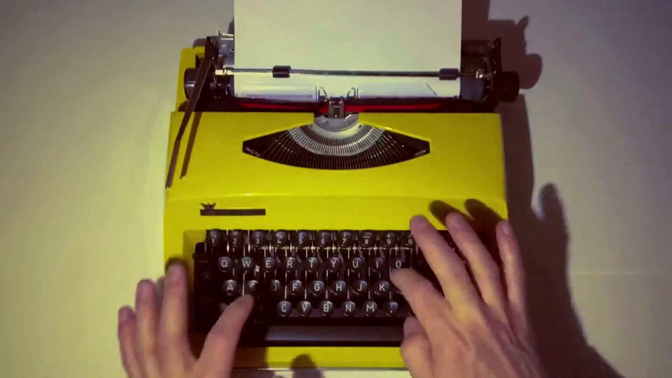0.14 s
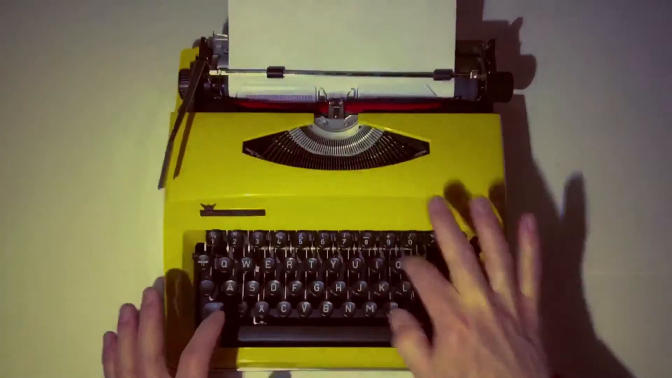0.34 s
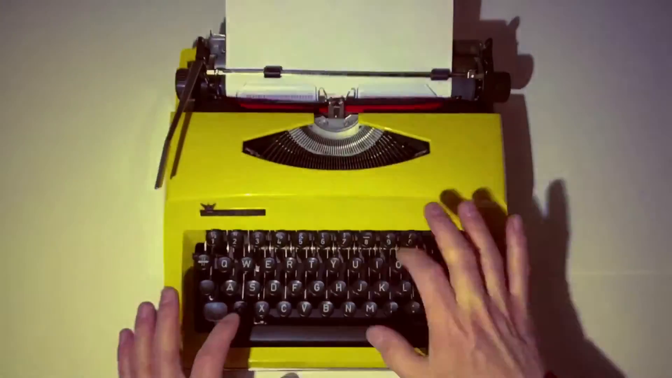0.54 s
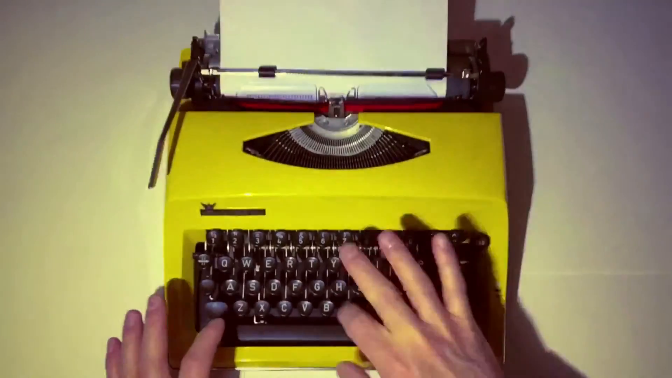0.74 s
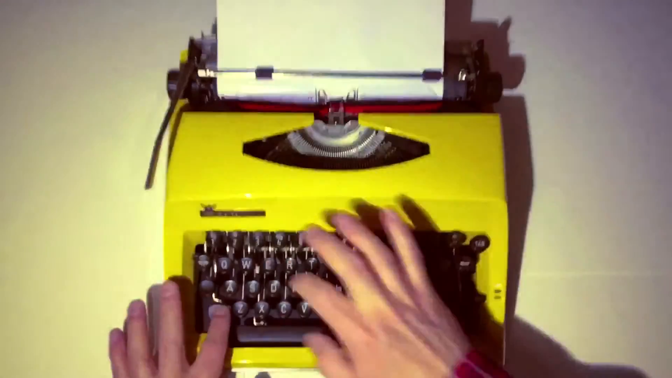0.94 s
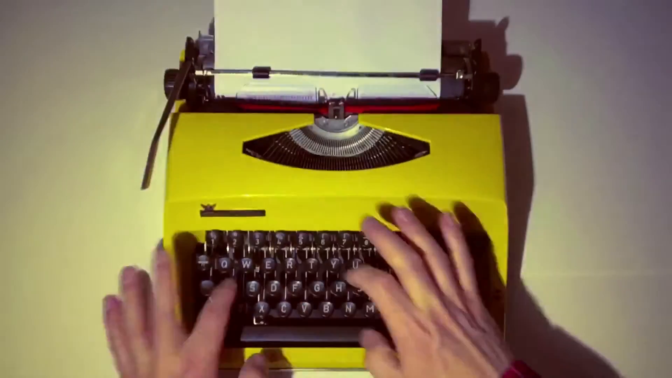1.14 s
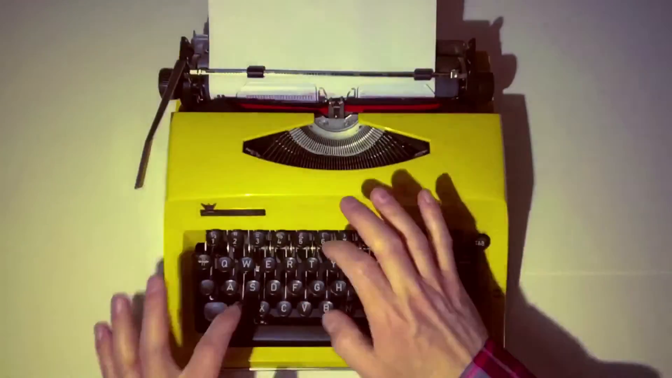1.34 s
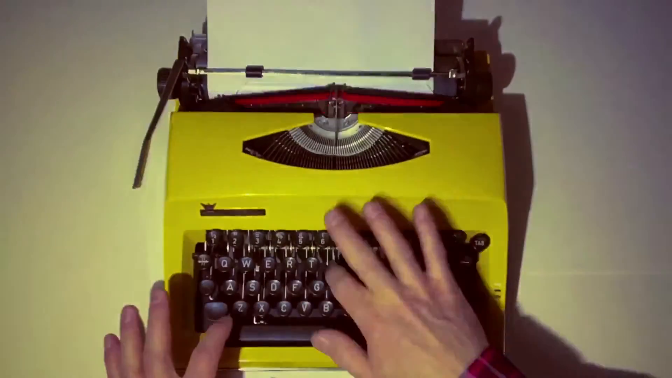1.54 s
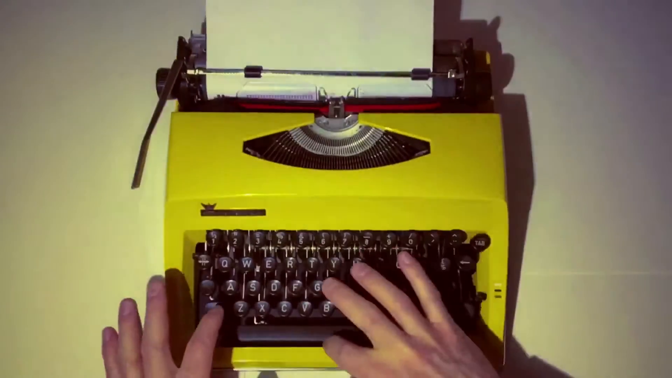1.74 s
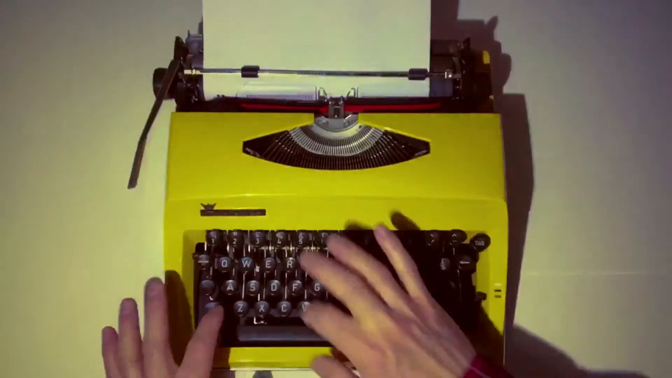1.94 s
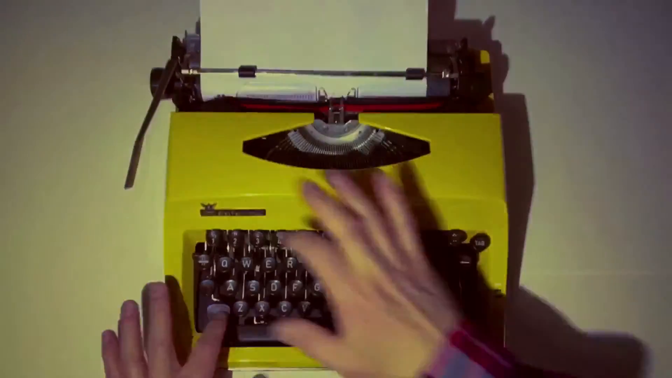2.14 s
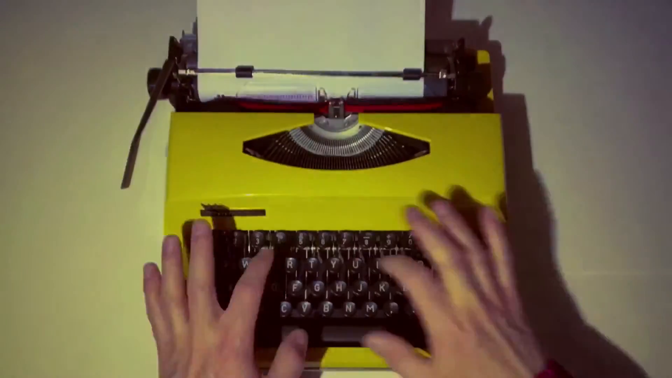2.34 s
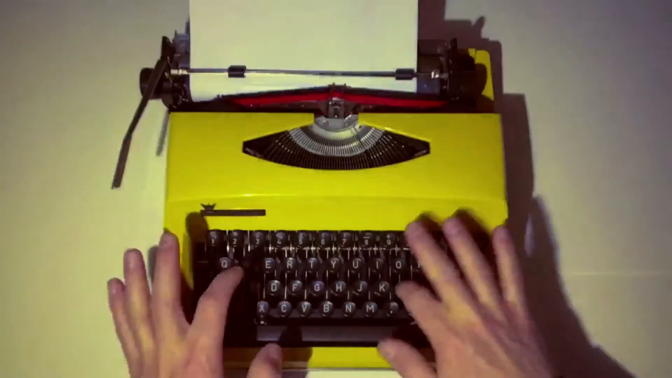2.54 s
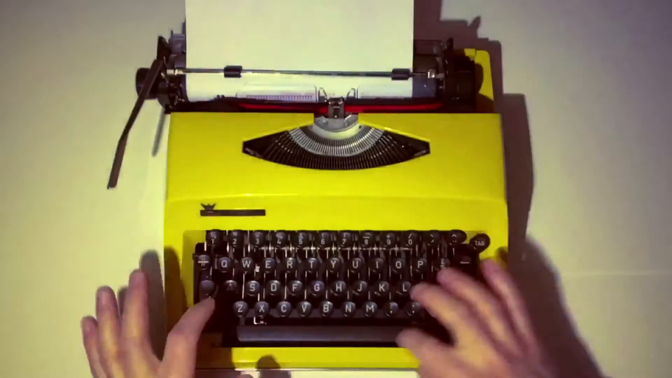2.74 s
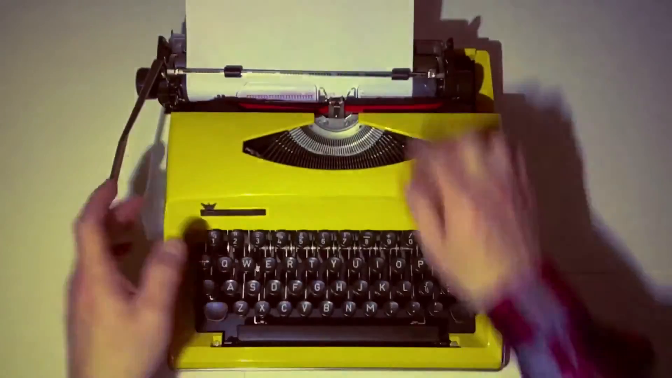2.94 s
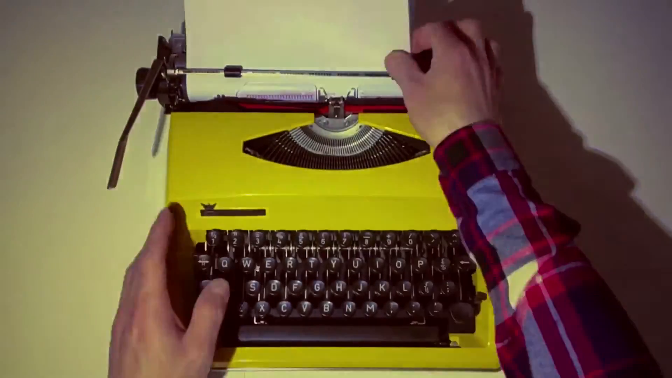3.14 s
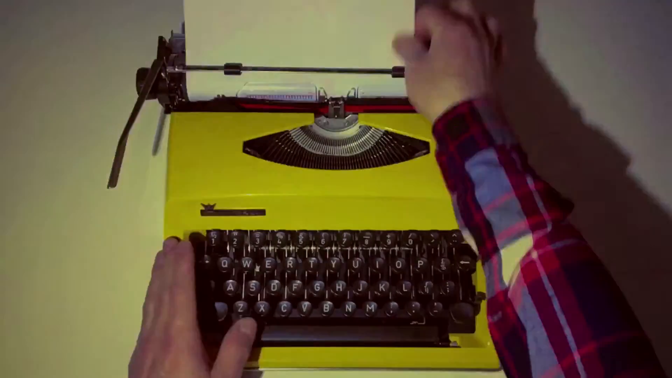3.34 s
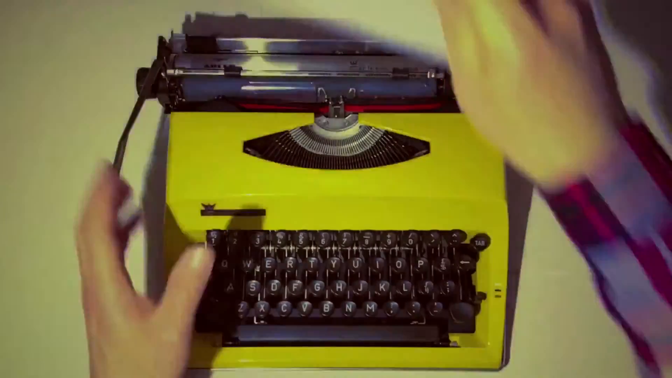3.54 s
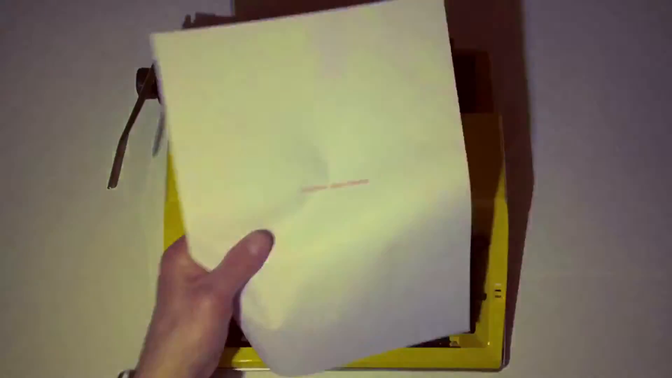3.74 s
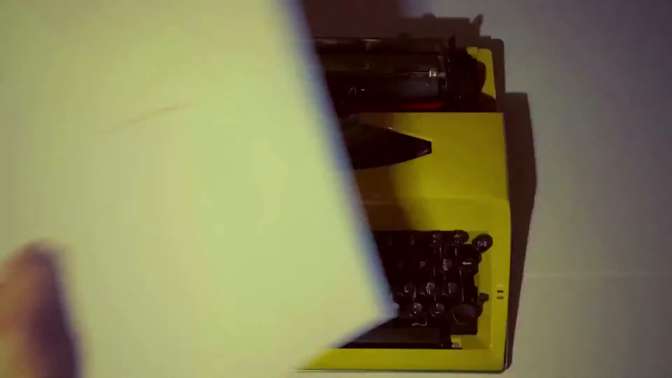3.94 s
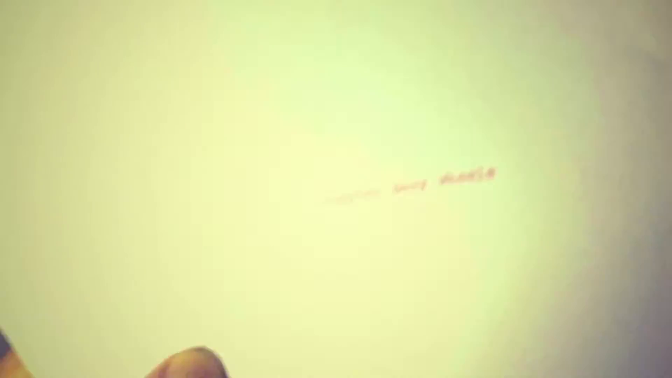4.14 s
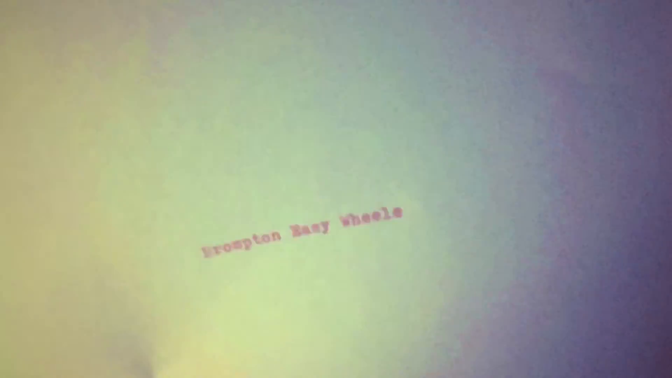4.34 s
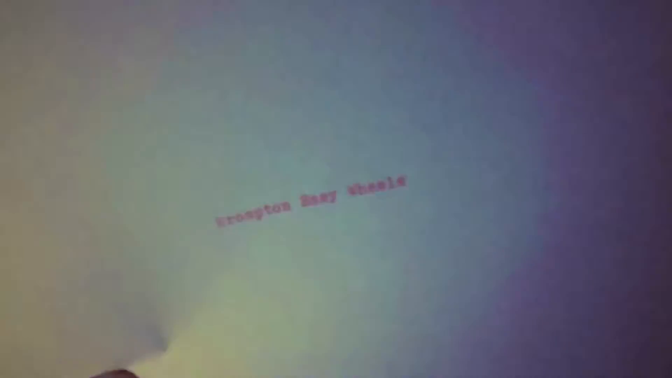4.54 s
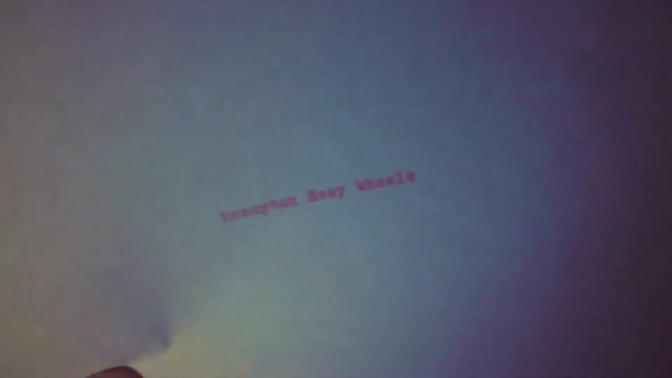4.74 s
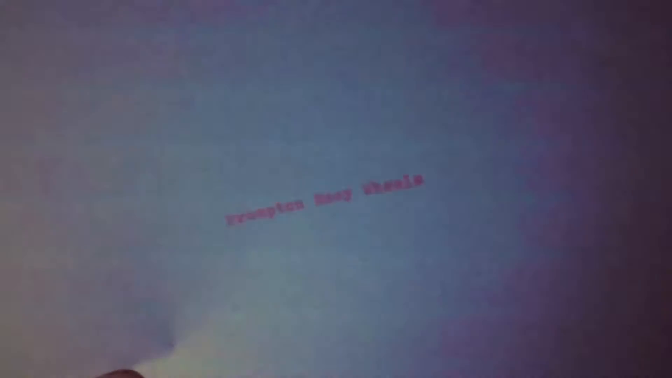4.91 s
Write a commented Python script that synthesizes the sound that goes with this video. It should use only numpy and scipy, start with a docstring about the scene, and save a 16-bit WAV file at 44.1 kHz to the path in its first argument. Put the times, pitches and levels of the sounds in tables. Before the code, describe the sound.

A small manual typewriter on a table, recorded very close in a quiet room with a short tail. As a previous stroke still rings, seven brisk letters fall between 0.1 and 0.8 s, each a tiny linkage rattle, a hard bright crack on paper, a dull thud and short steely ringing over a low case hum. The space bar bounces at 0.9 s; a hollow shift clunk comes at 1.0 and a double-click release at 1.2, among letters at 1.1, 1.25, 1.35 and 1.6. Another space at 2.0, shift at 2.07, then six quick letters until 2.7, with a shift release at 2.24. Ringing fades into a pause; fingers faintly brush paper near 3.2. At 3.42 to 3.51 the sheet is ripped out in a rising ratchet whizz ending in a snap. It flaps sharply from 3.6 to 3.8, crackles at 4.05 to 4.2, then settles with tiny crinkles into faint room air.

```python
"""Portable typewriter, close on a table

A small quiet room, the machine close to the microphone: seventeen quick letters, space bar and shift key between.
Type bars rattle up and crack on the paper (shaped noise), the platen thuds (falling sine), the case hums (damped sines).
The sheet is ripped out past a whizzing ratchet (fused ticks), flaps, and is held up, crackling (jerky noise)."""
import sys
import numpy as np
from scipy import signal
from scipy.fft import rfft, irfft, next_fast_len
from scipy.io import wavfile
from scipy.ndimage import uniform_filter1d

SR = 44100
rng = np.random.default_rng(int(sys.argv[2]) if len(sys.argv) > 2 else 0)


def dump(signal):
    """Clip the signal to [-1, 1] and save it as 16-bit WAV at the path in sys.argv[1]."""
    limited = np.clip(np.atleast_2d(signal).T, -1, 1)
    pcm = np.round(limited * 32767).astype(np.int16)
    wavfile.write(sys.argv[1], SR, pcm)


N = 223803  # length of the scene [samples]
T = np.arange(SR * 7 // 10) / SR  # time within one short sound [s]


def amp(db):
    """Decibels to gain."""
    return 10 ** (np.asarray(db) / 20)


def unit(x):
    """Scales to rms 1."""
    return x / np.sqrt(np.mean(x ** 2) + 1e-20)


def read(points, hz):
    """Joins points by straight lines over log frequency."""
    f, value = np.transpose(points)
    return np.interp(np.log(hz + 1), np.log(f + 1), value)


def add(mix, s, sound):
    """Mixes a sound in at s seconds, cut off at both ends of the mix."""
    at = round(s * SR)
    part, sound = mix[max(at, 0):], sound[max(-at, 0):]
    part[:len(sound)] += sound[:len(part)]


def colour(x, spectrum, peaks=()):
    """Weights x by a spectrum with resonances standing out of it, at rms 1."""
    size = next_fast_len(len(x))
    hz = np.fft.rfftfreq(size, 1 / SR)
    db = read(spectrum, hz)
    for f, width, up in peaks:
        db = db + up / (1 + (2 * (hz - f) / width) ** 2)
    return unit(irfft(rfft(x, size) * amp(db), size)[:len(x)])


def narrow(hz, width_hz):
    """Noise in one resonance, rms 1."""
    b, a = signal.iirpeak(hz, hz / width_hz, fs=SR)
    return unit(signal.lfilter(b, a, rng.standard_normal(N)))


def fade(x, t60s):
    """Lets each band die at its own speed, by 60 dB within its t60."""
    hz, t, z = signal.stft(x, SR, nperseg=256)
    decay = np.exp(-np.log(1000) * t / read(t60s, hz)[:, None])
    return signal.istft(z * decay, SR, nperseg=256)[1][:len(x)]


def burst(rise, hold, decay):
    """A gain that rises over rise seconds and dies away exponentially from hold seconds on."""
    return np.minimum(T / rise, 1) * np.exp(-np.maximum(T - hold, 0) / decay)


def swell(s, db, rise, decay):
    """A movement's gain: it grows to its peak at s seconds and dies away."""
    t = np.arange(N) / SR - s
    return amp(db) * np.exp(np.minimum(t / rise, -t / decay))


def together(gains):
    """The joint gain of movements that overlap: their powers add."""
    return np.sqrt(sum(gain ** 2 for gain in gains))


def rattle(per_s, decay, spread_db):
    """An envelope of loose parts knocking at random, rms 1."""
    chance, size = rng.random(len(T)), rng.standard_normal(len(T))
    knocks = (chance < per_s / SR) * amp(spread_db * np.clip(size, -2, 2)) ** 2
    power = signal.lfilter([1], [1, -np.exp(-2 / (decay * SR))], knocks)
    return unit(np.sqrt(power + 0.4 * power.mean()))


def modes(table, scatter_db):
    """Damped sines of a struck body; every blow shares its force among them differently."""
    hz, db, t60 = np.transpose(table)[:, :, None]
    gain = amp(db + scatter_db * rng.standard_normal(hz.shape))
    phase = rng.random(hz.shape)
    waves = np.sin(2 * np.pi * (hz * T + phase)) * np.exp(-np.log(1000) * T / t60)
    return (gain * waves).sum(0) / np.linalg.norm(gain) * np.sqrt(2)


# Spectrum of the faint air in the room: (frequency [Hz], relative level [dB])
AIR_SPECTRUM = [(15, -66), (25, -36.5), (75, -23), (104, -12), (188, -1.5), (240, -14), (274, -2.5),
                (322, -12), (399, -16), (582, -16), (4150, -28), (5280, -25), (8580, -31), (9810, -24.5),
                (15500, -35)]
AIR_DB = -66


def room_air():
    """Faint steady noise: the air of the room."""
    return amp(AIR_DB) * colour(rng.standard_normal(N), AIR_SPECTRUM)


# How long the room carries each band: (frequency [Hz], decay by 60 dB [s])
ROOM_DECAY = [(100, 0.13), (300, 0.37), (1000, 0.4), (4000, .35), (15000, .2)]


def room(x):
    """A small room's diffuse tail: noise whose bands die at their own speeds, starting after 4 ms."""
    tail = fade(rng.standard_normal(len(T)), ROOM_DECAY) * np.clip((T - .004) / 0.002, 0, 1)
    return signal.oaconvolve(x, tail / np.linalg.norm(tail))[:N]


# Resonances of type bars and springs: (frequency [Hz], width [Hz], level above the rest [dB])
BAR_RESONANCES = [(1960, 90, 1), (2430, 40, 3), (2673, 76, 8.5), (3294, 90, 3), (3690, 110, 5),
                  (4060, 110, 4), (4150, 60, 4.5), (5120, 190, 2), (5350, 50, -2), (6820, 140, 6),
                  (9900, 580, 3.5), (9860, 93, 4.5)]


def steel(spectrum, tilt_db=0, uneven_db=3.0):
    """The crowded modes of small steel parts as noise; each blow favours others. Tilt is in dB per octave."""
    hz = np.arange(100, 16000, 140)
    own_db = uneven_db * rng.standard_normal(len(hz)) * np.minimum(hz / 1000, 1)
    own_db += tilt_db * np.log2(hz / 6000)
    return colour(rng.standard_normal(len(T)), np.c_[hz, read(spectrum, hz) + own_db], BAR_RESONANCES)


# The case on the table: (frequency [Hz], relative level [dB], decay by 60 dB [s])
CASE_MODES = [(127.4, -3.5, .28), (151, -3, 0.27), (180, -3.5, .18), (199.2, -5, .85), (220, -6, 0.24),
              (240.3, -4, 0.45), (293, -10.5, 0.32), (338, -5.5, 0.29), (358, -12, 0.25), (511, -17, .25)]


def case():
    """The case swells into a low hum on the table: damped sines with a slow rise."""
    return modes(CASE_MODES, scatter_db=4.5) * burst(rise=0.023, hold=.01, decay=0.92)


# Spectrum of the ringing steel parts: (frequency [Hz], relative level [dB])
RING_SPECTRUM = [(40, -8.5), (150, 4), (350, 2.5), (700, -3.5), (1400, -3.5), (2500, -2.5), (4500, 1),
                 (7000, 1), (10000, 1), (15500, -1)]
# How long they ring in each band: (frequency [Hz], decay by 60 dB [s])
RING_DECAY = [(100, 0.083), (700, 0.27), (2000, 0.27), (5000, 0.23), (10000, .2), (15000, 0.22)]
EARLIER_S, EARLIER_DB = -.05, -29.5


def dying_letter():
    """Bars and case still ringing as the scene opens, from a letter struck just before."""
    out = np.zeros(N)
    bars = fade(steel(RING_SPECTRUM), RING_DECAY)
    add(out, EARLIER_S, amp(EARLIER_DB) * (bars + amp(-13) * case()))
    return out


def crinkle(gain, spectrum, per_s, spread_db, smooth):
    """Paper fibres slip in tiny jerks over a smooth hiss; each jerk spreads through the sheet for a millisecond."""
    jerks = (rng.random(N) < per_s / SR) * amp(spread_db * np.minimum(rng.exponential(1, N), 3)) ** 2
    power = signal.lfilter([1], [1, -np.exp(-1 / (0.00027 * SR))], jerks)
    envelope = np.sqrt(power / power.mean() + smooth ** 2)
    return gain * colour(envelope * rng.standard_normal(N), spectrum)


def buckle(jerk, hz):
    """A patch of the sheet answers a jerk in a broad band round its own pitch."""
    b, a = signal.iirpeak(hz, 1.3, fs=SR)
    return signal.lfilter(b, a, jerk) * np.sqrt(SR / (2 * hz))


def snap(hz):
    """One sudden jerk of the sheet: a short noise burst through its buckling patch."""
    jerk = rng.standard_normal(len(T)) * burst(rise=0.00068, hold=0.00049, decay=0.0022)
    return buckle(jerk, hz)


# The freed sheet flaps: (peak time [s], level [dB], rise [s], decay [s])
FLAP_MOVES = [(3.62, -34.5, .006, .024), (3.682, -30, .004, .024), (3.74, -22.5, .0035, .011),
              (3.755, -23, .003, .015), (3.802, -35.5, .012, .019)]
# The held sheet bends and crackles: (peak time [s], level [dB], rise [s], decay [s])
BEND_MOVES = [(3.838, -49, .002, .016), (4.058, -45.5, .003, .015), (4.083, -39.5, .005, .018),
              (4.168, -36, .002, .009), (4.19, -31, .004, .011)]
# The sheet buckles with a snap: (time [s], level [dB], centre frequency [Hz])
BUCKLE_SNAPS = [(3.499, -18, 1700), (3.505, -24, 900), (3.6, -42, 2000), (3.7385, -21, 3500),
                (3.754, -22, 3500), (3.785, -30, 5000), (3.837, -41, 1100), (4.054, -45, 1200),
                (4.08, -40, 900), (4.167, -38, 1300), (4.189, -32, 1400), (4.27, -49, 1500),
                (4.309, -53, 700), (4.422, -51, 1500), (4.462, -52, 700), (5.04, -58, 1500)]
# Spectra of flapping, of the held sheet and of its wobble: (frequency [Hz], relative level [dB])
FLAP_SPECTRUM = [(24, -57.5), (40, -23), (117, -24.5), (192, -4), (704, -12), (949, -3), (1050, -9.5),
                 (2710, -3), (7160, -5), (13700, -17), (15500, -8)]
HOLD_SPECTRUM = [(24, -58), (40, -49), (106, -29), (158, -1), (472, -6), (881, 0.5), (1520, -10.5),
                 (3470, -4), (8110, -21.5), (11800, -33), (15500, -27)]
WOBBLE_SPECTRUM = [(50, -38), (120, -2.5), (200, 3.5), (330, 0.5), (480, -9), (780, -4), (1100, -8),
                   (2000, -40.5), (8000, -25)]
FLAP_WOBBLE_DB, FLAP_WOBBLE_S = -27, .12  # wobble after a flap: level relative to it, decay
BEND_WOBBLE_DB, BEND_WOBBLE_S = -16, .042  # the same after a bend
BEND_BODY_DB, BEND_BODY_HZ = -8, 850  # the hollow body of the bending sheet
SETTLE_RUB_DB, SETTLE_RUB_HZ = 1, 780  # a soft hollow rub, relative to the settling


def paper():
    """The free sheet flaps, then bends in the hand; flaps and bends set the whole sheet wobbling."""
    swing = swell(s=3.62, db=-53, rise=.04, decay=.24)  # the sheet swings through the air
    settling = swell(s=4.485, db=-63.5, rise=.065, decay=.055)  # it comes to rest in the hand
    flapping = together([swell(*row) for row in FLAP_MOVES] + [swing])
    bending = together([swell(*row) for row in BEND_MOVES] + [settling])
    flap_wobbles = [swell(s, db + FLAP_WOBBLE_DB, rise, FLAP_WOBBLE_S) for s, db, rise, _ in FLAP_MOVES]
    bend_wobbles = [swell(s, db + BEND_WOBBLE_DB, rise, BEND_WOBBLE_S) for s, db, rise, _ in BEND_MOVES]
    wobbling = together(flap_wobbles + bend_wobbles + [settling])
    out = crinkle(flapping, FLAP_SPECTRUM, per_s=1200, spread_db=3, smooth=0.85)
    out += crinkle(bending, HOLD_SPECTRUM, per_s=740, spread_db=4.5, smooth=0.71)
    out += crinkle(wobbling, WOBBLE_SPECTRUM, per_s=82, spread_db=0.5, smooth=0.93)
    out += amp(BEND_BODY_DB) * bending * narrow(BEND_BODY_HZ, width_hz=450)
    out += amp(SETTLE_RUB_DB) * settling * narrow(SETTLE_RUB_HZ, width_hz=200)
    for s, db, hz in BUCKLE_SNAPS:
        add(out, s, amp(db) * snap(hz))
    return out


# Speed of the platen as the sheet is ripped out: (time [s], ratchet teeth per second [1/s])
PLATEN_SPEED = [(3.422, 350), (3.437, 620), (3.452, 850), (3.465, 1070), (3.478, 1130), (3.49, 1350),
                (3.51, 1450)]
FULL_SPEED = 1450  # teeth per s
PULL_RISE_S, SHEET_FREE_S, PAWL_FREE_S = .008, 3.506, 3.492


def pulled(db_per_doubling, until, decay):
    """Gain that grows with the platen's speed and dies once the pull lets go."""
    t = np.arange(N) / SR
    s, speed = np.transpose(PLATEN_SPEED)
    onset = np.clip((t - s[0]) / PULL_RISE_S + .5, 0, 1)
    release = np.exp(-np.maximum(t - until, 0) / decay)
    return onset * release * amp(db_per_doubling * np.log2(np.interp(t, s, speed) / FULL_SPEED))


RATCHET_DB = -23  # at full speed


def ratchet():
    """The pawl skips over the teeth of the spinning platen, so fast that the ticks fuse into a rising whizz."""
    s, rate = np.transpose(PLATEN_SPEED)
    t = np.arange(s[0], s[-1], 1 / SR)
    unsteady = unit(uniform_filter1d(rng.standard_normal(len(t)), 60))
    hz = np.interp(t, s, rate) * (1 + .015 * unsteady)
    ticks = np.diff(np.floor(np.cumsum(hz) / SR), prepend=0)  # one impulse a tooth
    out = np.zeros(N)
    add(out, s[0], colour(ticks, [(100, -29), (2200, -16.5), (3300, 1.5), (5300, 3), (7000, -3.5), (15000, -4)]))
    return amp(RATCHET_DB) * pulled(db_per_doubling=8.5, until=PAWL_FREE_S, decay=.009) * out


# Spectra of sliding fingertips, rubbing sheet and draught: (frequency [Hz], relative level [dB])
SLIDE_SPECTRUM = [(100, -1), (600, -0.5), (2000, -4), (4000, 0.5), (6000, 1.5), (8000, -1.5), (10000, -1.5),
                  (15500, -6)]
RUB_SPECTRUM = [(18, -44), (30, -24), (219, -3.5), (443, -8.5), (492, -4.5), (945, -7.5), (2760, -4),
                (3320, -4.5), (3880, -9.5), (5310, -8), (6050, -9.5), (15500, -6.5)]
DRAUGHT_SPECTRUM = [(15, -4.5), (40, 1.5), (90, -12), (300, -36), (2000, -71)]
RUB_DB, DRAUGHT_DB = -23.5, -53  # at full speed
SQUEAK_HZ, SQUEAK_WIDTH_HZ = 3930, 110


def pull():
    """Fingers slide along the sheet, beside a faint squeak of narrow noise, and drag it round the platen.

    The moving sheet pushes a draught of air aside."""
    slide = swell(s=3.22, db=-50, rise=.042, decay=.048)
    squeak = swell(s=3.26, db=-57.5, rise=.025, decay=.045)
    rub = amp(RUB_DB) * pulled(db_per_doubling=6, until=SHEET_FREE_S, decay=.016)
    draught = amp(DRAUGHT_DB) * pulled(db_per_doubling=11, until=SHEET_FREE_S, decay=.016)
    out = crinkle(slide, SLIDE_SPECTRUM, per_s=900, spread_db=-1.5, smooth=1.1)
    out += squeak * narrow(SQUEAK_HZ, SQUEAK_WIDTH_HZ)
    out += crinkle(rub, RUB_SPECTRUM, per_s=6200, spread_db=4.5, smooth=1)
    out += crinkle(draught, DRAUGHT_SPECTRUM, per_s=97, spread_db=-2.5, smooth=2)
    return out + ratchet()


TOUCH_S, TOUCH_DB, TOUCH_HZ = 1.918, -53, 4400


def key_touch():
    """A finger lands on a key with a faint tick of narrow noise, and the case answers."""
    out = np.zeros(N)
    tick = narrow(TOUCH_HZ, width_hz=600)[:len(T)] * burst(rise=.001, hold=.002, decay=.006)
    add(out, TOUCH_S, amp(TOUCH_DB) * (tick + case()))
    return out


# Spectrum of a clicking lever: (frequency [Hz], relative level [dB])
CLICK_SPECTRUM = [(40, -17.5), (300, 9), (900, -1), (1800, -2.5), (4300, 1.5), (7000, -4), (11000, -4),
                  (15500, -5.5)]


def click(length):
    """A lever chatters against its stop for about length seconds and shakes the steel round it."""
    ring = steel(CLICK_SPECTRUM, uneven_db=3.5)
    return ring * burst(rise=length / 2, hold=length, decay=0.0034) + amp(-10.5) * fade(ring, RING_DECAY)


# The carriage's modes: (frequency [Hz], relative level [dB], decay by 60 dB [s])
CARRIAGE_MODES = [(478, -5.5, 0.065), (529, -11.5, 0.21), (570, 0.5, 0.043), (642, -7, .12),
                  (740, -7.5, 0.081), (864, -13.5, .1), (1005, -8.5, 0.12), (1500, -13.5, 0.073),
                  (2280, -14.5, 0.1), (2630, -14.5, .12), (3420, -18, .12)]
# Spectrum of its loose parts: (frequency [Hz], relative level [dB])
LOOSE_SPECTRUM = [(60, -21), (140, -6), (300, 0), (560, 6.5), (1000, -5), (1500, -12), (3500, -18.5),
                  (12000, -30)]


def clunk():
    """The carriage's hollow modes ring while its loose parts rattle."""
    loose = steel(LOOSE_SPECTRUM) * burst(rise=0.0011, hold=.004, decay=0.023)
    loose = loose * rattle(per_s=100, decay=.003, spread_db=1.5)
    return modes(CARRIAGE_MODES, scatter_db=0) + amp(-7) * loose


# A lever clicks, then the carriage knocks on its stop, hardest under the shift key:
# (time [s], force [dB], lever lead [s], lever level [dB])
CARRIAGE_KNOCKS = [(.515, -14, .015, -40), (1.0045, 0, .0147, -27.5), (2.069, -3, .022, -34.5)]
KNOCK_CLICK_DB, KNOCK_CLUNK_DB, KNOCK_CASE_DB = -19.5, -22.5, -36  # at force 0 dB


def carriage_knocks():
    """The carriage meets its stop: a click, a hollow clunk and the humming case."""
    out = np.zeros(N)
    for s, force_db, lead, lever_db in CARRIAGE_KNOCKS:
        add(out, s - lead, amp(lever_db) * click(length=.0017))
        knock = amp(KNOCK_CLICK_DB) * click(length=0.0025)
        knock += amp(KNOCK_CLUNK_DB) * clunk() + amp(KNOCK_CASE_DB) * case()
        add(out, s, amp(force_db) * knock)
    return out


# The shift key is let go: (time [s], click level [dB], case level [dB])
SHIFT_RELEASES = [(1.1782, -23.5, -47), (2.2425, -27, -39)]
DOUBLE_CLICK_S, RELEASE_CHATTER_S = .0075, .0017


def shift_releases():
    """The shift linkage drops with a double click; the second one sets the case humming."""
    out = np.zeros(N)
    for s, click_db, case_db in SHIFT_RELEASES:
        add(out, s, amp(click_db) * click(RELEASE_CHATTER_S))
        second = amp(click_db) * click(RELEASE_CHATTER_S) + amp(case_db) * case()
        add(out, s + DOUBLE_CLICK_S, second)
    return out


STEP_S = .023  # the carriage steps this long after the blow


def step(tilt_db):
    """The escapement lets the carriage move on by one letter: a short rattle of steel."""
    envelope = burst(rise=0.0015, hold=.013, decay=.012)
    return steel(RING_SPECTRUM, tilt_db) * rattle(per_s=180, decay=.002, spread_db=0.5) * envelope


# The space bar hits its stop: (time [s], first click level [dB], first case level [dB])
SPACE_HITS = [(.893, -29.5, -34), (1.975, -31.5, -35)]
BOUNCE_S, BOUNCE_SHRINK = .025, .58  # first gap; each later gap is this fraction of the one before
BOUNCE_CLICK_DB, BOUNCE_CASE_DB, SPACE_CHATTER_S = -2, -8, .0065  # click loss grows with the bounce squared
SPACE_STEP_DB = -41


def space_bar(count=3):
    """The space bar bounces on its stop, ever weaker and faster, and the carriage steps on."""
    out = np.zeros(N)
    for s, click_db, case_db in SPACE_HITS:
        add(out, s + STEP_S, amp(SPACE_STEP_DB) * step(tilt_db=-2))
        for k in range(count):
            hit = amp(click_db + k ** 2 * BOUNCE_CLICK_DB) * click(SPACE_CHATTER_S)
            add(out, s, hit + amp(case_db + k * BOUNCE_CASE_DB) * case())
            s += BOUNCE_S * BOUNCE_SHRINK ** k
    return out


def thud(start_hz, end_hz, glide, decay):
    """A bending wave through the platen: its high part arrives first, so the pitch falls within milliseconds."""
    hz = end_hz + start_hz * rng.uniform(0.97, 1.47) * np.exp(-T / glide)
    envelope = np.exp(-T / decay) + 0.16 * np.exp(-T / 0.005)
    wave = np.sin(2 * np.pi * np.cumsum(hz) / SR) * envelope
    # so small a machine radiates little bass
    return signal.lfilter(*signal.butter(1, 70, "high", fs=SR), wave)


# One row a letter: (time [s], force [dB], rising linkage level [dB], platen thud relative level [dB],
# case relative level [dB], brightness [dB per octave])
LETTER_STRIKES = [(.0751, .5, -31.5, -33, -43, .4), (.1646, -1, -31, -30.5, -47.5, .6),
                  (.2729, -1.5, -25, -21, -48, -.8), (.3772, -2, -24, -37, -45, .4),
                  (.4981, .5, -25.5, -15.5, -52, .4), (.6405, -1, -28, -20, -48.5, .7),
                  (.7964, 2, -28, -18.5, -48, .4), (1.1108, -1.5, -26, -13.5, -56, -.7),
                  (1.2475, 0, -29, -30, -46, 1.2), (1.339, .5, -25.5, -35, -42.5, 2.4),
                  (1.6169, .5, -24, -13, -50.5, 1), (2.176, 0, -24.5, -25, -58, -.6),
                  (2.3604, 1, -29, -20.5, -46.5, -.4), (2.471, 1, -27.5, -25, -50, .6),
                  (2.5197, 1, -26.5, -25, -43.5, 2.4), (2.609, 1.5, -24.5, -24, -45.5, 1),
                  (2.6999, 1, -30.5, -19, -46, 1.4)]
# Spectrum of the crack on the paper: (frequency [Hz], relative level [dB])
CRACK_SPECTRUM = [(30, -7.5), (100, -16.5), (400, 5), (1000, 1.5), (2000, -5.5), (3500, -6), (6000, -2.5),
                  (8000, -3.5), (10000, -1.5), (13000, -1.5), (15500, -4.5)]
# Modes of springs that ring on: (frequency [Hz], relative level [dB], decay by 60 dB [s])
SPRING_MODES = [(2445, 0, .3), (2690, -1, .35), (3321, 0, .45), (3562, 0, .3), (3765, -1, .35),
                (3946, -3, .5), (4403, -1, .3), (4895, -2, .3), (5386, -1, .3)]
# the parts of every letter, at force 0 dB
CRACK_DB, TICK_DB, REBOUND_DB, RING_DB, STEP_DB, SPRINGS_DB = -17.5, -16.8, -24.5, -27.6, -41, -49
LINK_LEAD_S, REBOUND_S = .0099, .0019


def letters():
    """Linkage, crack, thud, ringing bars, then the escapement lets the carriage step."""
    out = np.zeros(N)
    frame = steel(RING_SPECTRUM)  # the frame rings alike under every letter
    for s, force_db, link_db, thud_db, case_db, tilt_db in LETTER_STRIKES:
        linkage = steel(RING_SPECTRUM, tilt_db) * rattle(per_s=1300, decay=0.0028, spread_db=2.5)
        linkage = linkage * burst(rise=0.00033, hold=.009, decay=0.0014)
        add(out, s - LINK_LEAD_S, amp(link_db) * linkage)

        crack = steel(CRACK_SPECTRUM, tilt_db) * burst(rise=0.0012, hold=0.002, decay=0.0021)
        crack = crack * rattle(per_s=2000, decay=0.00035, spread_db=3)
        add(out, s - .0015, amp(force_db + CRACK_DB) * crack)

        # the slug meets the paper with a hard tick, then rebounds
        tick = steel(CRACK_SPECTRUM, tilt_db + 1) * burst(rise=.0001, hold=.0004, decay=.0003)
        add(out, s - .0004, amp(force_db + TICK_DB) * tick)
        rebound = steel(CRACK_SPECTRUM, tilt_db) * burst(rise=0.00061, hold=0.0023, decay=0.0011)
        add(out, s + REBOUND_S, amp(force_db + REBOUND_DB) * rebound)

        platen = thud(start_hz=805, end_hz=167, glide=0.00076, decay=0.0022)
        add(out, s - .0004, amp(thud_db + 5.5) * platen)

        bars = fade(unit(frame + steel(RING_SPECTRUM, tilt_db)), RING_DECAY)
        add(out, s, amp(force_db + RING_DB) * bars * rattle(per_s=570, decay=0.0045, spread_db=4.5))
        add(out, s + STEP_S, amp(force_db + STEP_DB) * step(tilt_db))
        add(out, s, amp(case_db + 6.5) * case())
        add(out, s, amp(force_db + SPRINGS_DB) * modes(SPRING_MODES, scatter_db=1.5))
    return out


def scene():
    """Machine and paper close to the microphone, over the faint air and the short tail of the room."""
    sheet = pull() + paper()
    levers = key_touch() + carriage_knocks() + shift_releases() + space_bar()
    machine = dying_letter() + levers + letters()
    tail = room(amp(-23) * machine + amp(-19) * sheet)
    return (machine + sheet + tail + room_air())[None]


EDGE_HZ = 15500


def record(dry):
    """The recorder's band limit: a steep low-pass."""
    low_pass = signal.firwin(401, EDGE_HZ, window=("kaiser", 8), fs=SR)
    return signal.oaconvolve(dry, low_pass[None], "same")


dry = scene()
out = record(dry)
dump(out)
```